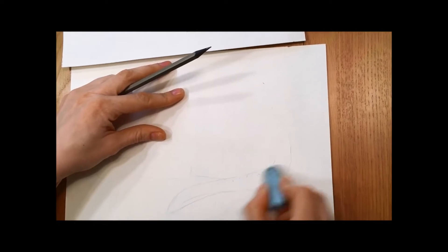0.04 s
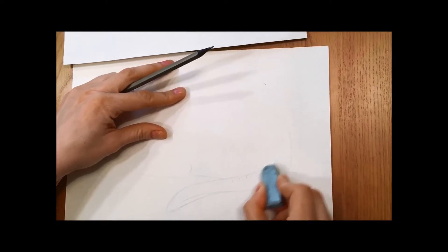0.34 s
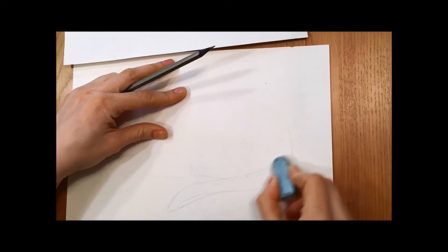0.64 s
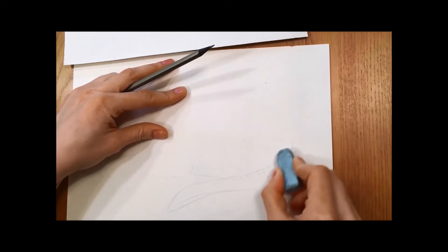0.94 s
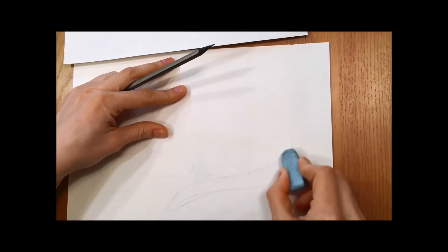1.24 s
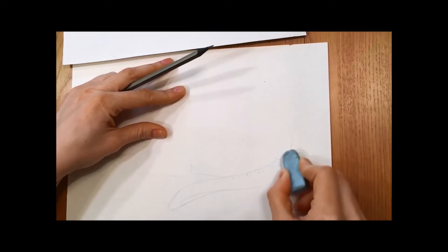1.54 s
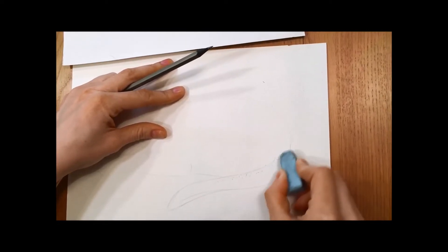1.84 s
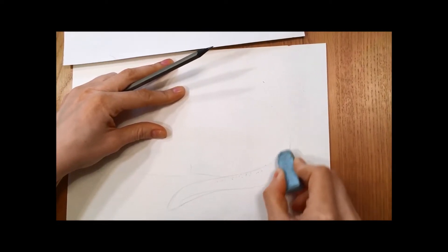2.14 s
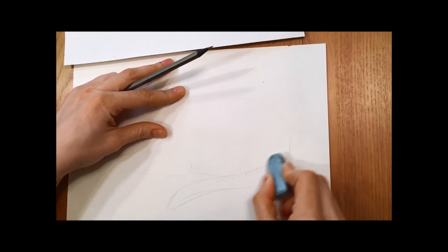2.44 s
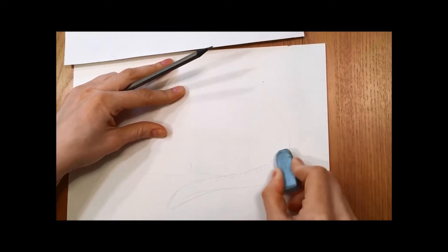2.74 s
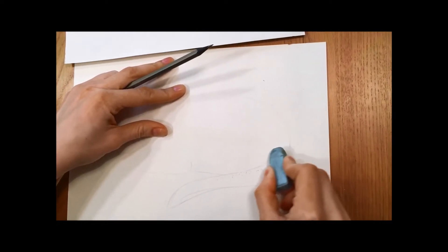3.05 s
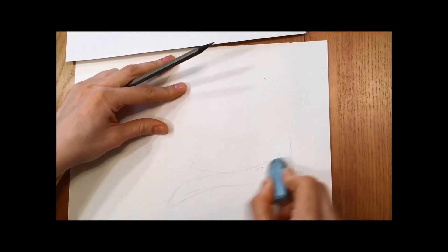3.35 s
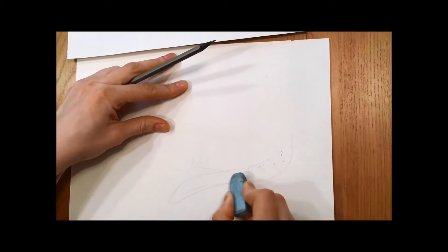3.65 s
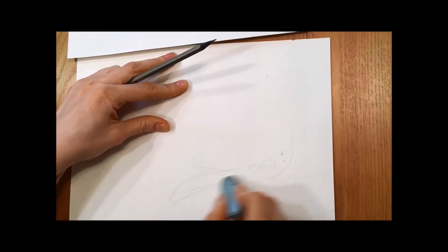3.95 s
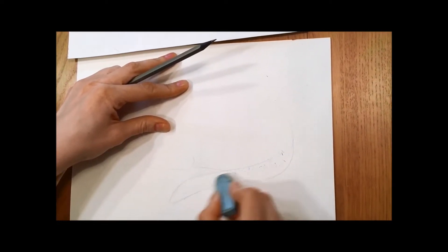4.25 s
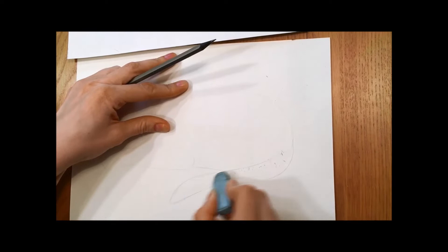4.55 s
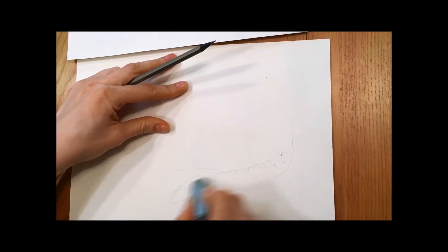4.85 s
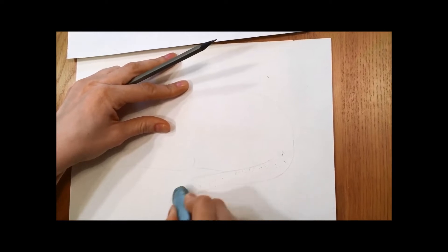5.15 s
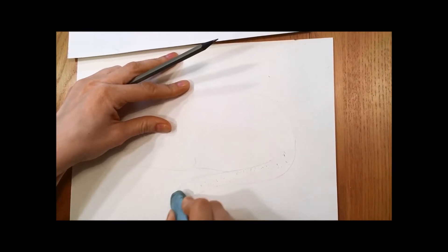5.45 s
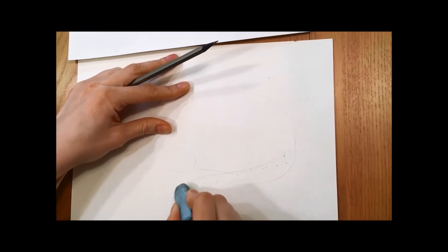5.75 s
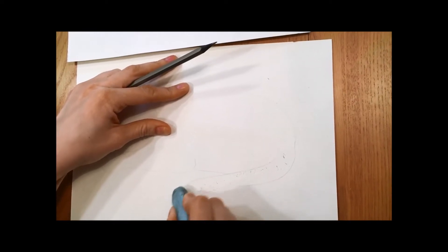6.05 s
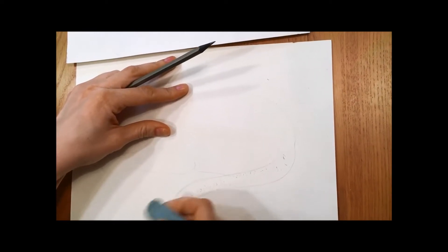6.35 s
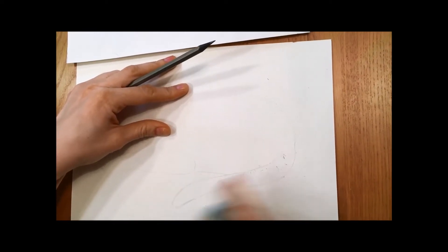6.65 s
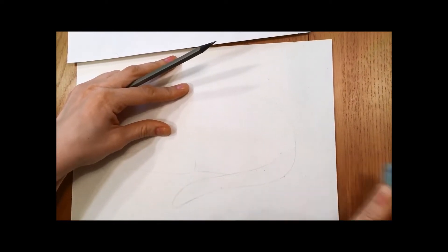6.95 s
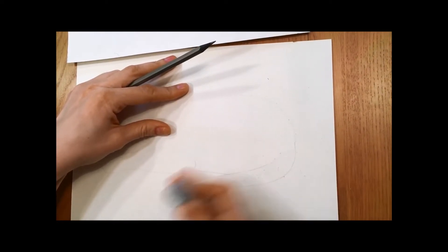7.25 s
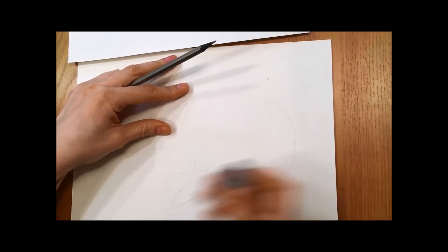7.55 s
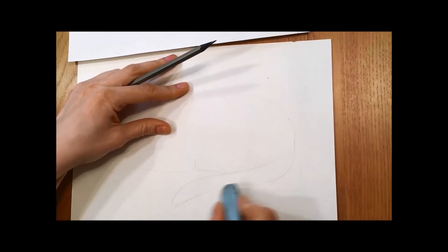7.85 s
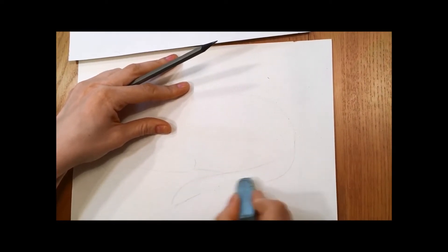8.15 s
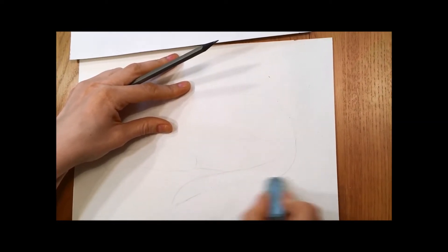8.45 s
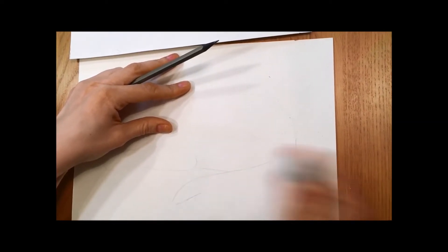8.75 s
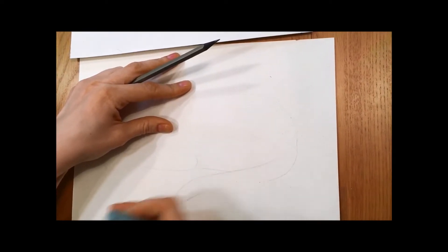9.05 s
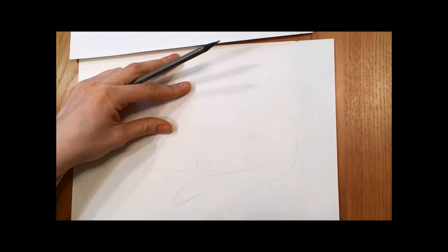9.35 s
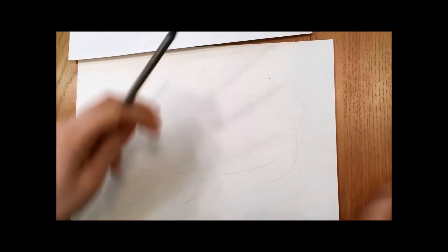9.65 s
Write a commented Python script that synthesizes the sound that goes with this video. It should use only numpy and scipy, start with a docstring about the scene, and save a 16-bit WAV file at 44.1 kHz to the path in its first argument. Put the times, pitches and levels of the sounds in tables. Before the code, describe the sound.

An eraser rubs back and forth on a sheet of paper in light, scratchy strokes, with soft bumps of a hand on the wooden desk. The rubbing fades, then the hand brushes the paper in three quick, much louder swishes with tiny ticks. A little more erasing follows, then two more swishes and a short knock on the desk. The sound is close, in a small room with a faint fan hum.

```python
"""An eraser rubs to and fro, close by, on a sheet of drawing paper on a wooden desk. Then the side of
the hand sweeps the crumbs off in a few quick, much louder strokes, and something knocks on the desk.
Both frictions are stick-slip: paper fibres catch and let go in dense clicks, coloured by the resonances
of the sheet. The hand bumps the desk softly, and nail and crumbs tick on the paper.
The sound is mono, in a small room where a distant fan hums quietly."""
import sys
import numpy as np
from scipy import signal
from scipy.fft import rfft, irfft, next_fast_len
from scipy.io import wavfile
from scipy.ndimage import uniform_filter1d

SR = 44100
rng = np.random.default_rng(int(sys.argv[2]) if len(sys.argv) > 2 else 0)


def inscribe(sig):
    """Save sig as 16-bit PCM at rate SR to the path in sys.argv[1].

    A 1-D sig is mono; a 2-D sig holds one channel per row.
    Samples are clipped to [-1, 1] before scaling.
    """
    pcm = np.round(np.clip(np.atleast_2d(sig).T, -1, 1) * 32767)
    wavfile.write(sys.argv[1], SR, pcm.astype(np.int16))


N = 427312

# Partials of the fan. Each row: frequency in Hz, rms level in dB.
FAN_PARTIALS = [(122, -71.5), (154, -65.5), (222, -75), (281, -82.5)]
# Spectra of the noises. Each row: frequency in Hz, relative spectral density in dB.
AIR_SPECTRUM = [(12, -28), (20, -20), (42, -0.5), (70, -6), (122, -5), (157, -2), (180, -8), (252, -13),
                (282, -11.5), (427, -21), (667, -21.5), (1870, -32.5), (2840, -30), (3540, -34.5),
                (15500, -34)]
DRUM_SPECTRUM = [(25, -36), (50, -10), (80, -1), (112, 3), (170, -7.5), (240, -8), (370, -15), (500, -27),
                 (1200, -33.5)]  # the desk under the hand
SKIN_SPECTRUM = [(5000, -34), (7000, -12), (8200, -10), (10000, -3), (12500, 0), (15500, -1.5)]  # skin sliding on paper
RING_SPECTRUM = [(3000, -34), (4800, -10), (5700, 0), (7000, -1), (8500, -7.5), (12000, -22)]  # the sheet vibrating freely
RUSTLE_SPECTRUM = [(200, -20), (550, 0), (900, -1.5), (1400, -6), (2100, -3.5), (3200, 2), (4300, 1),
                   (6000, -22), (9000, -37)]  # the sheet rustling
RUBBER_SPECTRUM = [(150, -5), (500, -0.5), (1000, -8), (2000, -5.5), (3000, -3.5), (4500, -5), (6000, -3),
                   (9000, 1.5), (12000, 0), (15500, -1.5)]  # rubber sliding on paper
CORNER_SPECTRUM = [(1000, -12), (4500, -13), (5600, -7), (6900, 0), (9000, -1.5), (10500, -2.5)]  # rubber at the corner of the sheet
# Resonances and hollows of the sheet. Each row: centre in Hz, width in Hz, gain in dB.
SHEET_RESONANCES = [(1516, 380, 4.5), (2690, 210, 2.5), (3650, 1020, 2.5), (4800, 1030, 0.5),
                    (5340, 520, 1.5), (7550, 540, -2), (8386, 730, 3), (10380, 480, -8.5),
                    (11100, 760, -1.5)]
# Modes of the desk. Each row: frequency in Hz, relative level in dB, time to fall 60 dB in seconds.
DESK_MODES = [(122, -4.5, 0.1104), (189.4, -9.5, 0.082), (224, -9.5, 0.11), (383, -2.5, 0.0463),
              (560, -2, 0.05), (865, -3, 0.03), (1150, -7.5, 0.042)]
# Soft bumps of the hand on the desk. Each row: start in seconds, level in dB.
HAND_BUMPS = [(0.874, -46), (1.473, -49.5), (1.776, -46.5), (2.094, -43.5), (2.339, -48), (2.801, -44),
              (3.001, -47), (5.961, -50), (6.233, -47), (6.44, -40.5), (6.782, -43.5), (7.228, -41),
              (7.954, -48), (8.699, -37), (9.142, -44), (9.294, -44)]
# Ticks of nail and crumbs. Each row: start in seconds, level in dB, pitch in Hz.
PAPER_TICKS = [(0.0343, -40, 8350), (0.337, -40, 11000), (6.3798, -23, 3930), (6.3874, -33, 13500),
               (6.771, -34.5, 13800), (8.648, -38.5, 12900), (8.6737, -23.5, 14100), (9.169, -33, 9000)]
# Knocks on the desk. Each row: start in seconds, peak level in dB, low-pass cutoff in Hz,
# relative level of the modes in dB, time constant of the crack in seconds.
DESK_KNOCKS = [(0.058, -51.5, 3000, -23, 0.02), (0.824, -55, 800, -14.5, 0.0077),
               (2.581, -49.5, 3000, -20, 0.014), (2.598, -47.5, 1600, -4, 0.0126),
               (2.606, -39.5, 211, -4, 0.0085), (6.637, -50, 1010, -9.5, 0.016),
               (9.289, -37, 300, -12, 0.015), (9.549, -32, 507, -4, 0.0087),
               (9.561, -24.5, 1730, -7, 0.004), (9.566, -31.5, 600, -7, 0.006),
               (9.582, -48, 500, -6, 0.0045)]
# Sweeps and light brushes of the hand. Each row: start, attack, time to the fastest moment, time on the
# paper and release by 60 dB, all in seconds; base level in dB; offsets for ring, rustle and drum in dB.
HAND_SWEEPS = [(6.383, .005, .008, .035, .081, -52, -6.5, -16, -13),
               (7.113, .0102, .011, .0135, .055, -41.3, -10, -18, -17),
               (7.684, .013, .026, .058, .083, -45.5, -14, -18, -7),
               (8.644, .004, .006, .024, .07, -52, -5, -14, -3),
               (9.452, .03, .04, .05, .11, -56.5, -15, -20, -15),
               (6.415, .048, .061, .087, .052, -30.2, -8.5, -20, -16),
               (6.778, .054, .112, .124, .052, -30, -7, -19, -19),
               (7.216, .056, .116, .136, .064, -29, -6, -17, -13.5),
               (8.67, .054, .083, .105, .04, -29.1, -3.5, -17.5, -11.5),
               (9.136, .084, .145, .15, .135, -28.3, -3.2, -14.5, -13.5)]
# Path of the eraser. Each row: time in seconds, place on the sheet (0 is the corner, 1 the middle).
ERASER_PATH = [(0, 0.132), (2.6, 0.31), (3.6, 0.65), (9.6, 0.98)]
# Bouts of even rubbing. Each row: start and end in seconds, number of strokes, base level at the start
# and at the end in dB, brightness in dB, extra level and extra brightness of return strokes in dB.
ERASER_BOUTS = [(-0.015, 0.293, 2, -56.5, -57, -2.5, 2.5, 5), (0.313, 0.46, 1, -60, -60, -2.5, 0, 0),
                (0.436, 0.977, 4, -63.5, -62, 0.5, 4, -1.5), (0.994, 1.271, 2, -58, -55, 2.5, 0, 0),
                (1.269, 1.568, 2, -54.5, -60, 2, -1, -1), (1.589, 2.192, 4, -58, -54.5, 3, -3.5, -4.5),
                (2.203, 2.403, 2, -59.5, -59, 2, -0.5, -0.5), (2.404, 3.327, 10, -64, -76, 0.5, 7.5, 0),
                (3.322, 3.772, 4, -65, -56.5, 1.5, -6.5, 1), (3.774, 4.283, 4, -56.8, -56.5, 3.5, -6.5, 0),
                (4.288, 4.916, 5, -58, -58, 2.5, -1, 1), (4.921, 5.139, 2, -60.5, -61.5, 3.5, 0.5, -1.5),
                (5.153, 6.286, 9, -70, -73, 2, -1.5, 1.5), (6.303, 6.391, 1, -65, -65, 6, 0, 0),
                (7.928, 8.321, 3, -64.5, -56.5, 3, 4, 0.5), (8.312, 8.502, 1, -54.5, -54.5, 4.5, 0, 0),
                (8.52, 8.653, 1, -67, -67, 9, 0, 0)]

SWELL_DB_PER_S, SLOW_DB_PER_S = 76, 175  # a sweep gathers speed, then slows
RING_S, DAMPED_DB = 0.02, -8  # the hand damps the sheet except near the fastest moment
DRUM_ATTACK_S, DRUM_FADE_DB_PER_S, DRUM_RELEASE_S = 0.017, 70, 0.235  # the desk settles slowly


def undb(db):
    """Amplitude grows tenfold for every 20 dB."""
    return 10 ** (np.asarray(db) / 20)


def unit(x):
    """Normalisation to an rms of 1."""
    return x / np.sqrt(np.mean(x ** 2))


def add(out, start_s, x):
    """Superposition: x adds to out from start_s on."""
    i = int(start_s * SR)
    x = x[max(-i, 0):len(out) - i]
    out[max(i, 0):max(i, 0) + len(x)] += x


def colour(x, spectrum, peaks=()):
    """Spectral shaping by a smooth curve with bell-shaped resonances; the result has an rms of 1."""
    f = np.geomspace(10, SR / 2, 900)
    hz, db = np.transpose(spectrum)
    gain_db = np.interp(np.log(f), np.log(hz), db)
    for centre, width, height in peaks:
        gain_db = gain_db + height * np.exp(-2 * ((f - centre) / width) ** 2)
    size = next_fast_len(N, real=True)
    gain = np.interp(np.fft.rfftfreq(size, 1 / SR), f, undb(gain_db))
    return unit(irfft(rfft(x, size) * gain, size)[:N])


def cut(x, hz, kind, order=2):
    """A maximally flat low-pass or high-pass filter."""
    return signal.sosfilt(signal.butter(order, min(hz, SR / 2 - 1000), kind, fs=SR, output="sos"), x)


def wander(rate):
    """Random modulation of rms 1, gliding to a new value rate times a second."""
    hold = max(int(SR / rate), 1)
    steps = np.repeat(rng.standard_normal(N // hold + 1), hold)
    return unit(uniform_filter1d(steps, hold)[:N])


def air_and_fan(air_db=-61, waver_db=2, drift_rad=0.66):
    """Low room noise lies under a fan's hum, whose partials are modulated in amplitude and phase."""
    t = np.arange(N) / SR
    air = undb(air_db + .5 * wander(5.5)) * colour(rng.standard_normal(N), AIR_SPECTRUM)
    hum = sum(undb(db + waver_db * wander(14)) * np.sin(2 * np.pi * hz * t + drift_rad * wander(14))
              for hz, db in FAN_PARTIALS)
    return air + np.sqrt(2) * hum


def room(x, low_t60=0.478, high_t60=0.15, split_hz=2500, build_s=0.0057):
    """Reverberation: the diffuse echoes of a small room decay exponentially, the treble first."""
    t = np.arange(SR) / SR
    noise = rng.standard_normal(SR)
    low = cut(noise, split_hz, "low", order=1)
    tail = low * undb(-60 * t / low_t60) + (noise - low) * undb(-60 * t / high_t60)
    tail *= np.clip(t / build_s, 0, 1)
    return signal.fftconvolve(x, tail / np.sqrt(np.sum(tail ** 2)))[:N]


def bumps(hz=68, rise_s=0.0051):
    """Damped oscillation: the heel of the hand pushes the desk top through one or two slow swings."""
    out, t = np.zeros(N), np.arange(SR // 8) / SR
    swing = t / rise_s * np.exp(1 - t / rise_s) * np.sin(2 * np.pi * hz * t)
    for start, db in HAND_BUMPS:
        add(out, start, undb(db) * swing)
    return out


def ticks(snap_s=0.00027, crackle_s=0.0049, crackle_db=-15):
    """Impulse excitation: a nail or crumb makes a snap of a few cycles, and the sheet crackles briefly."""
    out, t = np.zeros(N), np.arange(SR // 40) / SR
    for start, db, hz in PAPER_TICKS:
        snap = np.exp(-t / snap_s) * np.sin(2 * np.pi * hz * t)
        crackle = cut(rng.standard_normal(len(t)), 2100, "high") * np.exp(-t / crackle_s)
        add(out, start, undb(db) * (snap + undb(crackle_db) * crackle))
    return out


def knocks(crack_db=6):
    """Modal vibration: a blow cracks and rings the desk; a softer contact leaves only the low modes."""
    out, t = np.zeros(N), np.arange(SR // 4) / SR
    ring = sum((-1) ** k * undb(db - 60 * t / t60) * np.sin(2 * np.pi * hz * t)
               for k, (hz, db, t60) in enumerate(DESK_MODES))
    for start, peak_db, cutoff_hz, ring_db, crack_s in DESK_KNOCKS:
        crack = undb(crack_db) * rng.standard_normal(len(t)) * np.exp(-t / crack_s)
        blow = cut(undb(ring_db) * ring + cut(crack, 82, "high"), cutoff_hz, "low")
        add(out, start, undb(peak_db) * blow / np.abs(blow).max())
    return out


def slips(per_second, spread_db, scatter_s=.008):
    """Stick-slip: paper fibres catch and let go in uneven clicks, whose treble the desk scatters."""
    slipping = rng.random(N) < per_second / SR
    clicks = slipping * rng.standard_normal(N) * undb(spread_db * rng.uniform(-1.5, 1.5, N))
    t = np.arange(SR // 50) / SR
    paths = cut(rng.standard_normal((2, len(t))) * np.exp(-t / scatter_s), 1200, "high")
    first, second = (signal.oaconvolve(clicks, path / np.linalg.norm(path))[:N] for path in paths)
    angle = 2 * wander(3)  # the scattering changes as the contact travels over the sheet
    return clicks + .42 * (np.cos(angle) * first + np.sin(angle) * second)


def hand_reflection(x, lag_s, share):
    """Comb filtering: the sound interferes with its reflection off the moving hand."""
    i = np.arange(N)
    reflected = np.interp(i - lag_s * SR, i, x)
    return (x + share * reflected) / np.hypot(1, share)


def contact(t, lands, attack_s, lifts, release_s):
    """The envelope of a touch rises smoothly, holds, and decays exponentially once the hand lifts."""
    attack = np.sin(np.pi / 2 * np.clip((t - lands) / attack_s, 0, 1)) ** 2
    return attack * undb(-60 * np.maximum(t - lifts, 0) / release_s)


def hand(hiss_gain_db=2.5, ring_gain_db=-1.0, drum_gain_db=0.2, grip_db=1.5):
    """Sliding friction grows with speed: skin hisses, the sheet rings and rustles; the desk drums below."""
    time = np.arange(N) / SR
    envelopes, travel = np.zeros((4, N)), np.zeros(N)
    for lands, attack_s, swell_s, length_s, release_s, db, ring_db, rustle_db, drum_db in HAND_SWEEPS:
        fastest, lifts = lands + swell_s, lands + length_s
        active = (time > lands) & (time < lifts + max(release_s, DRUM_RELEASE_S))
        t = time[active]
        swell_db = -SWELL_DB_PER_S * np.maximum(fastest - t, 0)
        slow_db = -SLOW_DB_PER_S * np.maximum(np.minimum(t, lifts) - fastest, 0)
        rub = undb(swell_db + slow_db) * contact(t, lands, attack_s, lifts, release_s)
        damping_db = DAMPED_DB * (1 - np.exp(-((t - fastest) / RING_S) ** 2))
        settling = undb(-DRUM_FADE_DB_PER_S * (t - lands))
        weight = contact(t, lands, DRUM_ATTACK_S, lifts, DRUM_RELEASE_S) * settling
        layers = [rub, rub * undb(ring_db + damping_db), rub * undb(rustle_db), weight * undb(drum_db)]
        envelopes[:, active] += undb(db) * np.array(layers)
        travel[active] = np.minimum((t - lands) / (lifts + release_s - lands), 1)
    hiss_env, ring_env, rustle_env, drum_env = envelopes
    hiss = undb(hiss_gain_db) * hiss_env * colour(slips(25000, 0.78), SKIN_SPECTRUM, SHEET_RESONANCES)
    ring = undb(ring_gain_db) * ring_env * colour(slips(20000, 3.35), RING_SPECTRUM, SHEET_RESONANCES)
    rustle = rustle_env * colour(slips(8000, 2.0), RUSTLE_SPECTRUM, SHEET_RESONANCES)
    lag_s = .0007 + .0004 * travel + .00003 * wander(4)
    friction = hand_reflection(hiss + ring + rustle, lag_s, share=.28)
    drum = undb(drum_gain_db) * drum_env * colour(slips(2500, 1.13), DRUM_SPECTRUM)
    return friction * undb(grip_db * wander(220)) + drum


def strokes():
    """Reciprocating motion: each bout divides into strokes of equal length, out and back in turn."""
    for start, end, count, first_db, last_db, bright_db, return_db, return_bright_db in ERASER_BOUTS:
        length = (end - start) / count
        for k in range(count):
            db = first_db + (last_db - first_db) * (k + .5) / count
            back = k % 2
            yield start + k * length, length, db + back * return_db, bright_db + back * return_bright_db


def eraser(judder_db=1.57, face_db=-3.5, edge_db=-1.5, rasp_db=6.5, rest_s=0.0026):
    """Friction noise follows each stroke's speed; the flat face drags duller, the edge hisses brighter."""
    face_env, edge_env = np.zeros((2, N))
    for start, length, db, bright_db in strokes():
        speed = np.sin(np.linspace(0, np.pi, int((length - 2 * rest_s) * SR))).clip(0)
        force = undb(db) * speed ** 1.04
        add(face_env, start + rest_s, force * undb(-.4 * bright_db))
        add(edge_env, start + rest_s, force * undb(.5 * bright_db) * speed ** 0.13)
    # the middle of the sheet rasps lower than its corner
    place = np.interp(np.arange(N) / SR, *np.transpose(ERASER_PATH))
    middle = colour(slips(12000, 2.0), RUBBER_SPECTRUM, SHEET_RESONANCES + [(5663, 840, rasp_db)])
    corner = colour(slips(12000, 2.1), CORNER_SPECTRUM, SHEET_RESONANCES)
    face_noise = np.sqrt(place) * middle + np.sqrt(1 - place) * corner
    edge_noise = colour(slips(15000, 2.0), RUBBER_SPECTRUM, SHEET_RESONANCES)
    face = face_env * unit(cut(face_noise, 10400, "low", order=6))
    edge = edge_env * unit(cut(edge_noise, 9830, "high", order=6))
    rock_db = .5 * wander(8.2)  # the eraser rocks a little between face and edge
    judder = undb(judder_db * wander(250))
    friction = judder * (undb(face_db - rock_db) * face + undb(edge_db + rock_db) * edge)
    return hand_reflection(friction, lag_s=.0005 + .00005 * wander(7), share=.16)


def scene(paper_room_db=-13.0, knock_room_db=-8):
    """Direct and reverberant sound add; knocks spread through the desk and excite the room more."""
    paper = eraser() + hand() + ticks()
    wood = knocks()
    echoes = room(undb(paper_room_db) * paper + undb(knock_room_db) * wood)
    mono = paper + wood + bumps() + echoes + air_and_fan()
    return np.array([mono, mono])


def record(dry, top_hz=15900):
    """Band limiting: a steep elliptic low-pass removes the highest treble."""
    return signal.sosfilt(signal.ellip(12, .1, 80, top_hz, fs=SR, output="sos"), dry)


dry = scene()
out = record(dry)
inscribe(out)
```